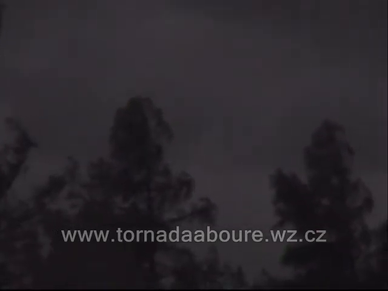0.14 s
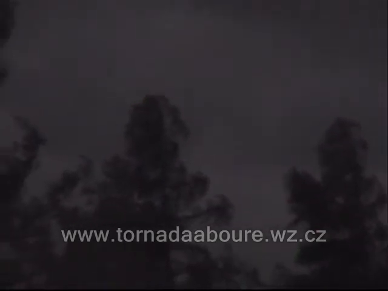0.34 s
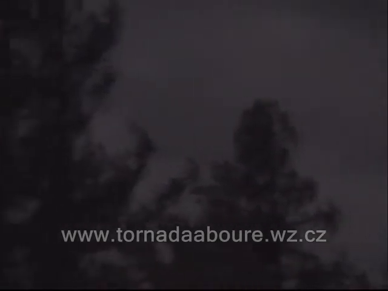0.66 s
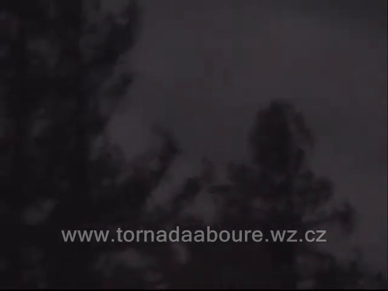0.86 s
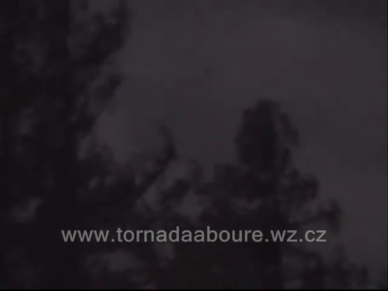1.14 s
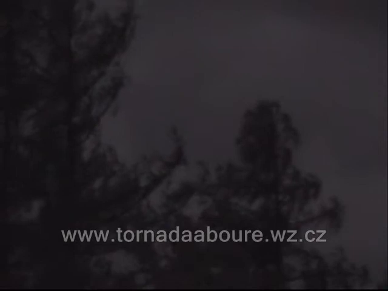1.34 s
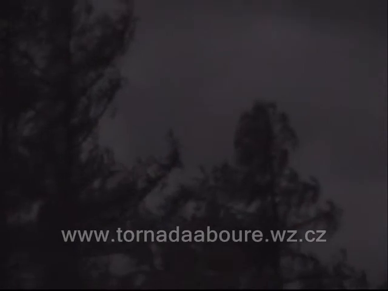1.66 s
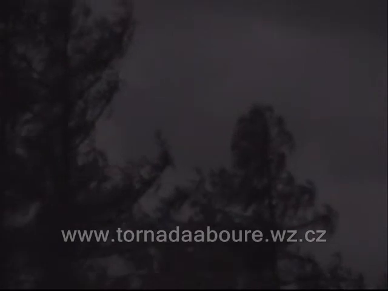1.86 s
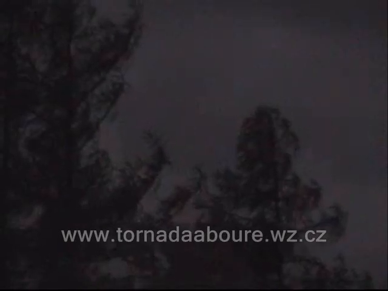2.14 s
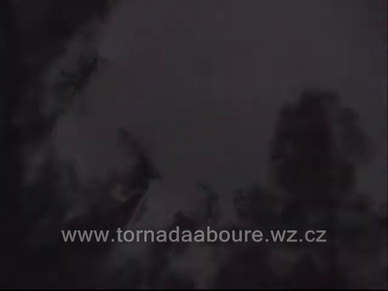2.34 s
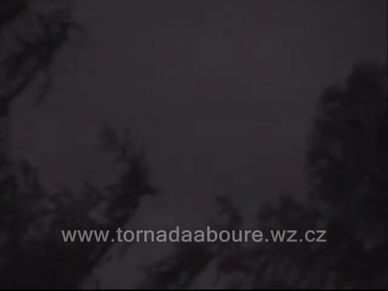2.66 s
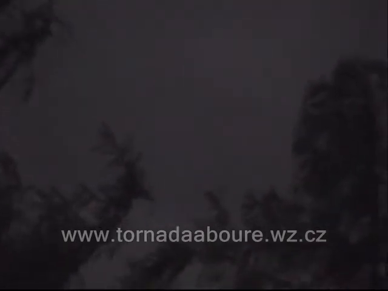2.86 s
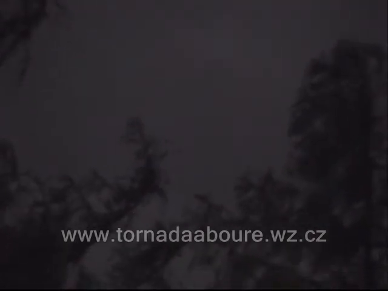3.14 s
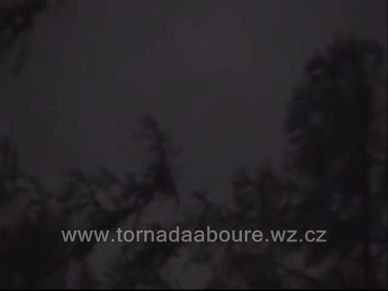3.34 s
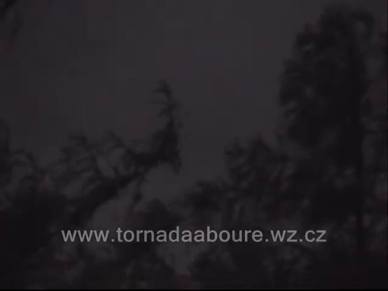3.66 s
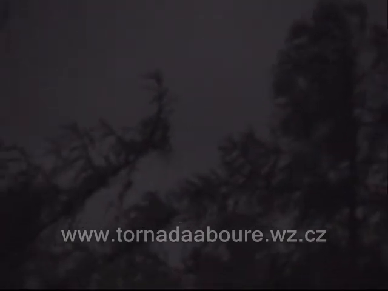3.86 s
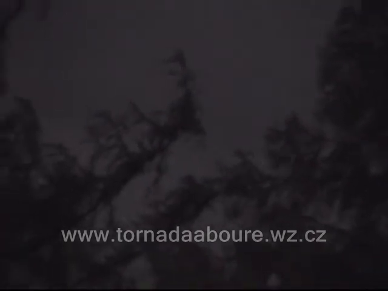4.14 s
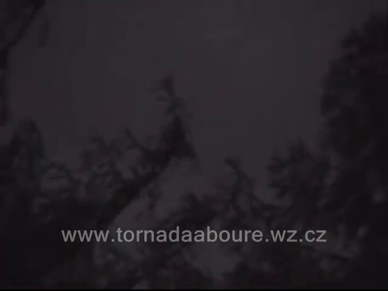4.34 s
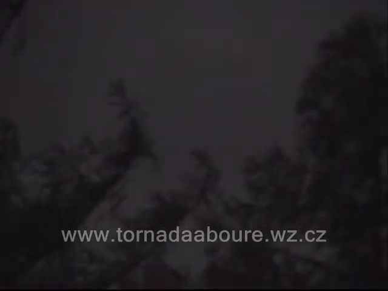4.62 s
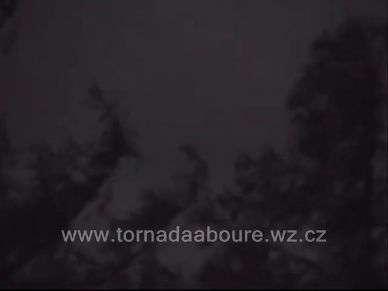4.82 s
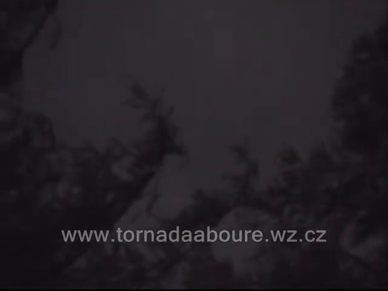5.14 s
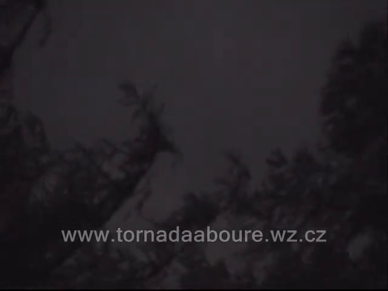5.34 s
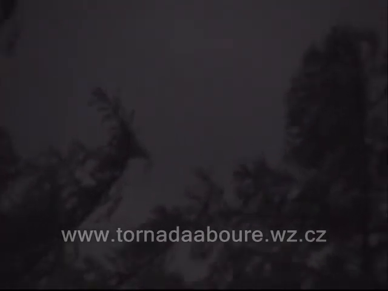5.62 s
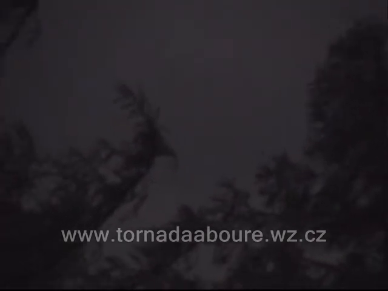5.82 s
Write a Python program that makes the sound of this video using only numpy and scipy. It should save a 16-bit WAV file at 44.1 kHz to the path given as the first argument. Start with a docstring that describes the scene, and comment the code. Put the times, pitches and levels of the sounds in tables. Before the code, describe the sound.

A storm wind blows through tall conifers close to a small handheld stereo camera. The trees make a continuous, breathy mid-range roar with branch rush and a nearly even, muted needle hiss, swelling only slightly. Gusts press on the bare microphone as deep, wide, fluttering rumbles and thumps, jumping between left and right. Light knocks come at 0.1 and 0.4 s, then a dense, rougher flurry from 0.8 to 1.2 s. After a lull around 1.4 to 1.6 s, softer bumps lead to one very hard, distorted blow at 2.2 s. From 2.6 to 3.8 s it is calmer, mostly tree roar with weak bumps. Buffeting returns from 3.95 to 4.5 s, eases, then builds from 5.3 s into crowded booming thumps, heaviest and overloading at about 5.8 s, fading towards 6 s. A faint, steady high motor whine and wide background noise persist underneath, with dull treble.

```python
"""The roar of tall conifers in a storm wind, with branch rush and a nearly even needle hiss: shaped noise.
Eddies buffet the two ports of a small tape camera's microphone: low noise, mostly in opposite phase left and right.
Single thumps are short bells of steepened swings; the strongest overload at the peaks.
The camera's motor whines faintly: three steady tones. Steady wide noise, opposite in the channels, lies beneath."""
import sys
import numpy as np
from scipy import signal
from scipy.fft import rfft, irfft
from scipy.io import wavfile
from scipy.ndimage import uniform_filter1d, map_coordinates

SR = 44100
rng = np.random.default_rng(int(sys.argv[2]) if len(sys.argv) > 2 else 0)


def to_wav(s):
    """Save 16-bit WAV."""
    ch = np.atleast_2d(s).T  # columns
    pcm = np.round(np.clip(ch, -1, 1) * 32767)  # PCM
    wavfile.write(sys.argv[1], SR, pcm.astype(np.int16))


def nominal_scale(level):
    """Amplitude ratio for a level in decibels (scalar or array-like)."""
    x = np.asarray(level, float) / 20
    return 10 ** x


N = 264159

# colour of the trees, part common to both channels: (frequency [Hz], relative level [dB])
TREE_CENTRE_COLOUR = [(35, -40), (60, -24.5), (180, -10), (367, -2.5), (500, -1.5), (653, 2), (850, 1.06),
                      (1100, -4), (1550, -11), (2700, -14), (3800, -16.5), (5330, -20.5), (7200, -25),
                      (8200, -31.5)]
# colour of the steady wide noise, opposite in the channels, camera motor and microphone self noise included:
# (frequency [Hz], relative level [dB])
WIDE_NOISE_COLOUR = [(88, -31.5), (150, -18.5), (300, -9.5), (500, -4), (915, 0), (1400, -1), (2260, -2),
                     (3000, -4), (4000, -6), (5300, -11.5), (7000, -15.5), (7700, -19), (8200, -31)]
# balance of the trees: (frequency [Hz], left minus right [dB])
TREE_BALANCE = [(60, -11.5), (120, 3.5), (240, 2), (480, 1), (970, -0.5), (1930, -1.5), (3870, 0.5),
                (7760, 3)]
# strength of the wind in the trees, used as swing about its mean: (time [s], level [dB])
WIND_STRENGTH = [(0.0, -28), (0.57, -29), (2.45, -28), (3.17, -30), (4.32, -30.5), (4.67, -29.5),
                 (5.87, -28.5), (5.92, -29.5), (5.99, -28)]
# roar, rush, hiss: (mean level [dB], share of the wind's swing followed [dB/dB])
CROWN_LAYERS = [(-28.5, 0.67), (-30.5, 1.2), (-37, 1.05)]
# gusts on the ports, levels 19 ms off the peak:
# (peak time [s], large eddies [dB], small eddies [dB], common part [dB], fall [dB/s])
PORT_GUSTS = [(0.0, -35, -42, -41, 90), (0.15, -35, -41, -47, 150), (0.45, -27.5, -36, -34, 250),
              (0.86, -21, -16, -25.5, 200), (1.12, -21, -26.5, -29, 107), (1.4, -40, -43, -43, 81),
              (1.6, -41, -43, -39, 84), (1.77, -24.5, -31.5, -34.5, 82), (2.17, -19, -27.5, -29, 191),
              (2.59, -29.5, -34, -39.5, 128), (2.94, -34, -34, -40, 142), (3.3, -49, -47, -42.5, 102),
              (3.61, -39, -44.5, -38.5, 93), (3.95, -26, -29.5, -31.5, 82), (4.14, -20.5, -23.5, -28, 87),
              (4.49, -26, -35, -34.5, 130), (4.77, -33, -39.5, -35, 80), (5.03, -32, -39, -35, 47),
              (5.33, -17, -27, -28, 84), (5.44, -22, -25, -37, 133), (5.6, -20, -28, -30.5, 71),
              (5.77, -12.5, -25, -25.5, 144), (5.99, -28, -31.5, -36.5, 100)]
# floor between gusts: (large eddies [dB], small eddies [dB], common part [dB])
LULL_LEVELS_DB = (-57.5, -53, -44.5)
# single eddies, levels of the fundamental:
# (time [s], opposite part [dB], swing [Hz], common part [dB], port struck [-1 right to 1 left])
THUMP_EVENTS = [(0.131, -17, 167, -27, 0.5), (0.144, -21, 101, -28, 0.89), (0.417, -11, 128, -19, 0.87),
                (0.813, -12, 92, -22, -0.9), (0.831, -9, 127, -26, 1), (0.853, -9, 130, -12.5, -0.5),
                (0.876, -6, 171, -9, -0.53), (0.887, -10, 190, -13.5, -0.73), (0.919, -12, 140, -31, -0.73),
                (0.976, -16, 82, -27, 0.99), (1.066, -9, 100, -17, 0.38), (1.106, -13, 120, -19, 0.096),
                (1.14, -13, 109, -32, 0.81), (1.201, -10, 120, -37, -0.2), (1.318, -24, 59, -40, 0.1),
                (1.591, -18, 71, -40, 0.3), (1.692, -18, 72, -35, 0.1), (1.754, -18, 63, -34, -0.2),
                (1.854, -20, 90, -39, 0.7), (2.194, -11, 70, -23, -0.5), (2.207, 3, 115, -16, -0.59),
                (2.553, -19, 113, -28, -0.8), (2.576, -18, 66, -30, -0.38), (2.919, -13, 80, -25, -0.14),
                (3.278, -28, 79, -41, 0.2), (3.949, -14.5, 84, -33, -0.41), (3.992, -13, 75, -38, -0.4),
                (4.028, -7, 80, -27, 0.21), (4.136, -11, 72, -34, 0.58), (4.16, -16, 122, -32, 0.2),
                (4.183, -14, 120, -28, -0.03), (4.201, -11, 92, -35, -0.5), (4.263, -5, 90, -19.5, -0.61),
                (4.328, -15, 65, -28, 0.6), (4.503, -6, 85, -29, 0.0), (5.267, -10, 118, -21, 0.55),
                (5.293, -11, 68, -22, 0.9), (5.326, -14, 125, -31, 0.78), (5.373, -4, 80, -19.5, 0.7),
                (5.409, -9, 156, -23, 0.47), (5.435, -5, 68, -20.5, -0.39), (5.552, -11, 76, -27, 0.07),
                (5.573, -3.5, 78.5, -24, -0.07), (5.593, -9, 62, -23, 0.2), (5.628, -12, 71, -25, -0.3),
                (5.694, -6.5, 62, -22, 0.1), (5.724, -8, 121, -18, 0.12), (5.743, -3, 102, -14, 0.0),
                (5.786, 1, 98, -12.5, 0.66), (5.817, 3.5, 94, -20, -0.52), (5.829, -7, 100, -21.5, -0.34),
                (5.891, -11, 102, -23, 0.29)]
# motor tones: (frequency [Hz], common part [dB rms], opposite part [dB rms])
MOTOR_TONES = [(2624, -58, -55), (2682, -59, -58), (2698, -52, -53)]


def rms_one(x):
    """Scale to unit rms."""
    return x / np.sqrt(np.mean(x ** 2) + 1e-20)


def in_time(rows):
    """Columns of a time table as curves, one value a sample."""
    time_s, *columns = np.transpose(rows)
    return [np.interp(np.arange(N) / SR, time_s, column) for column in columns]


def at_hz(points):
    """A frequency table read at every bin, on a log frequency axis."""
    bin_hz = np.maximum(np.arange(N // 2 + 1) * SR / N, 1)
    table_hz, values = np.transpose(points)
    return np.interp(np.log(bin_hz), np.log(table_hz), values)


def cut(x, hz, kind, order=2):
    """Butterworth filter."""
    return signal.sosfilt(signal.butter(order, hz, kind, fs=SR, output="sos"), x)


def drift(knots_per_s):
    """Smooth random curve through knots of unit spread."""
    knots = rng.standard_normal(400)
    return map_coordinates(knots, [np.arange(N) / SR * knots_per_s], order=3)


def left_right(centre, width):
    """Sum and difference to two channels."""
    return np.array([centre + width, centre - width])


def trees():
    """Countless needles shed vortices: smooth noise; roar, rush and hiss follow the wind."""
    roar_top_hz, rush_top_hz = 1400, 4000
    air = rfft(rng.standard_normal(N)) * nominal_scale(at_hz(TREE_CENTRE_COLOUR))
    hz = np.arange(N // 2 + 1) * SR / N
    roar = 1 / (1 + (hz / roar_top_hz) ** 6)
    below_hiss = 1 / (1 + (hz / rush_top_hz) ** 6)
    shares = (roar, below_hiss - roar, 1 - below_hiss)
    wind_db, = in_time(WIND_STRENGTH)
    wind_swing_db = wind_db - wind_db.mean()
    centre = 0
    for (level_db, follows), share in zip(CROWN_LAYERS, shares):
        swell_db = follows * wind_swing_db + 0.25 * drift(8.8)
        centre = centre + nominal_scale(level_db + swell_db) * rms_one(irfft(air * share, N))
    # tanh turns a left-right ratio into difference over sum
    side_share = np.tanh(at_hz(TREE_BALANCE) * np.log(10) / 40)
    leaning = irfft(rfft(centre) * side_share, N)
    return left_right(centre, leaning)


def buffet():
    """Eddies press on the ports; the recorder widens the bass, so the difference between ports dominates."""
    large, small, shared = gusts()
    apart = large * eddies((25, 88), lumpy_db=-1.0, even_s=0.034, order=3)
    apart += small * eddies((90, 130), lumpy_db=12.0, even_s=0.082, order=2)
    # the common part's blend follows the balance of large and small
    small_share = 1 / (1 + (large / small * nominal_scale(-7.5)) ** 2)
    common = np.sqrt(1 - small_share) * eddies((24, 95), lumpy_db=6.0, even_s=0.064, order=3)
    common += np.sqrt(small_share) * eddies((95, 170), lumpy_db=2.0, even_s=0.11, order=2)
    return left_right(shared * common, apart)


def gusts():
    """Each gust rises to a rounded peak and falls as fast; powers add to the lull. Gains: large, small, common."""
    t_s = np.arange(N) / SR
    power = nominal_scale(LULL_LEVELS_DB)[:, None] ** 2 * np.ones(N)
    for peak_s, *levels_db, fall_db_per_s in PORT_GUSTS:
        # 15 ms rounds the peak
        shape_db = -fall_db_per_s * (np.hypot(t_s - peak_s, 0.015) - 0.0242)
        power = power + nominal_scale(levels_db)[:, None] ** 2 * nominal_scale(shape_db) ** 2
    return np.sqrt(power)


def eddies(band_hz, lumpy_db, even_s, order):
    """Turbulent pressure: one hump of noise with gentle skirts, evened over a short time, lumpy within it."""
    low_hz, high_hz = band_hz
    x = cut(rng.standard_normal(N), low_hz, "high")
    x = cut(x, high_hz, "low", order=order)
    x = x * nominal_scale(lumpy_db * drift(40.0))
    return x / np.sqrt(uniform_filter1d(x ** 2, int(even_s * SR)) + 1e-12)


def thumps():
    """An eddy sweeps past: brief swings of pressure under a bell, stronger on the port it strikes."""
    apart, common = np.zeros((2, N))
    t = np.arange(-2200, 2200)  # samples
    draws = rng.random((len(THUMP_EVENTS), 2))
    for (time_s, apart_db, hz, common_db, port), (turn, coin) in zip(THUMP_EVENTS, draws):
        at = np.clip(round(time_s * SR) + t, 0, N - 1)
        cycles = hz * t / SR
        width_cycles = 0.93 - 0.02 * apart_db  # harder blows are shorter
        bell = np.exp(-4 * np.log(2) * (cycles / width_cycles) ** 2)
        bell[t > 0] **= 1.4  # leaves faster than it comes
        phase = 2 * np.pi * (cycles + turn)
        # in phase favours left, opposed favours right
        lag = np.arccos(np.clip(port, -1, 1)) * np.sign(coin - 0.5)
        # the harder the blow, the steeper its rise; steeper still in the common part
        steep = np.clip(0.18 + 0.11 * nominal_scale(apart_db), 0, 0.7)
        apart[at] += nominal_scale(apart_db) * bell * swing(phase, steep)
        common[at] += nominal_scale(common_db) * bell * swing(phase + lag, steep + 0.11)
    return cut(left_right(common, apart), 22, "high")


def swing(phase, steep):
    """The swing rises fast and falls slowly: overtones in step, weakening by steep and by root of number."""
    return sum(steep ** k * np.sin((k + 1) * phase) / np.sqrt(k + 1) for k in range(6))


def whine():
    """Steady motor tones, phase wandering slightly, reach the ports through the housing, unequally."""
    t_s, out = np.arange(N) / SR, 0
    turns_rad = rng.uniform(0, 2 * np.pi, (len(MOTOR_TONES), 2))
    for (hz, centre_db, width_db), turn_rad in zip(MOTOR_TONES, turns_rad):
        phase = 2 * np.pi * hz * t_s + turn_rad[:, None] + 0.4 * drift(3.0)
        tones = np.sqrt(2) * np.sin(phase)  # unit rms
        out = out + left_right(nominal_scale(centre_db) * tones[0], nominal_scale(width_db) * tones[1])
    return out


def wide_noise():
    """Shaped noise opposite in the channels: steady, it does not follow the wind."""
    wide = rms_one(irfft(rfft(rng.standard_normal(N)) * nominal_scale(at_hz(WIDE_NOISE_COLOUR)), N))
    level_db = -35 + 0.3 * drift(1.5)
    return left_right(0, nominal_scale(level_db) * wide)


def scene():
    """All sources at the microphone."""
    return trees() + buffet() + thumps() + whine() + wide_noise()


def band_limit(x):
    """A steep low-pass at the top of the band."""
    return signal.sosfilt(signal.butter(12, 8360, fs=SR, output="sos"), x)


def record(dry):
    """The top is cut steeply; the strongest thumps clip at full scale."""
    top_hz = 8380  # stopband edge, 60 dB down
    narrow = signal.sosfilt(signal.cheby2(18, 60, top_hz, fs=SR, output="sos"), dry)
    mix = np.clip(narrow, -1, 1)
    return band_limit(mix)


dry = scene()
out = record(dry)
to_wav(out)
```